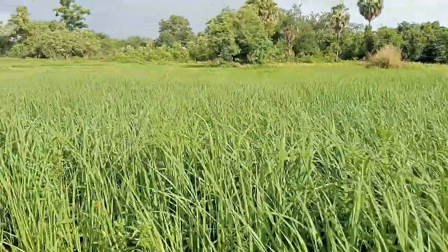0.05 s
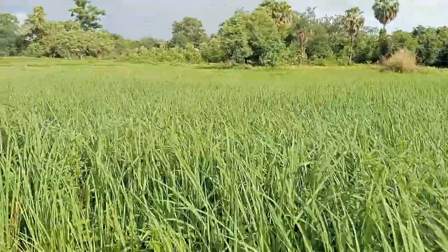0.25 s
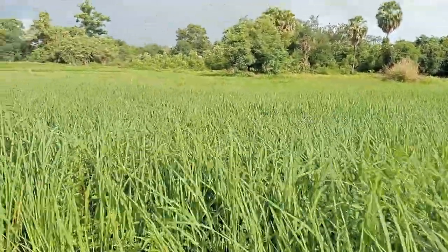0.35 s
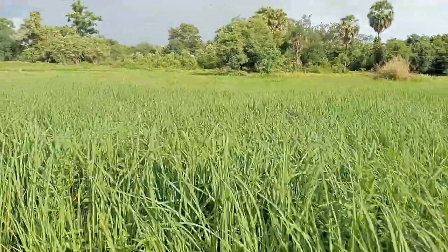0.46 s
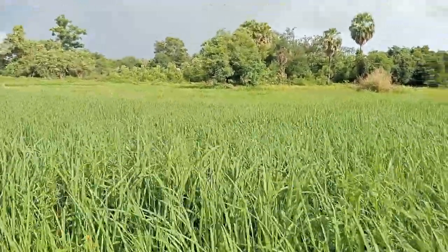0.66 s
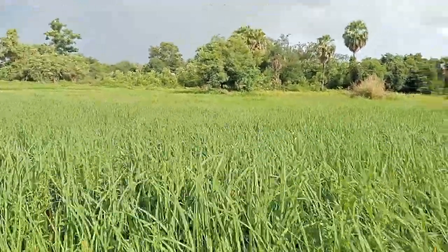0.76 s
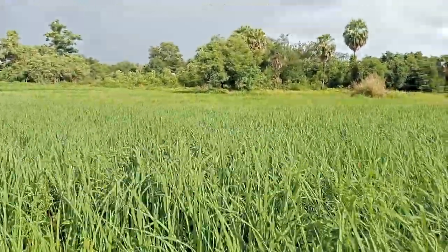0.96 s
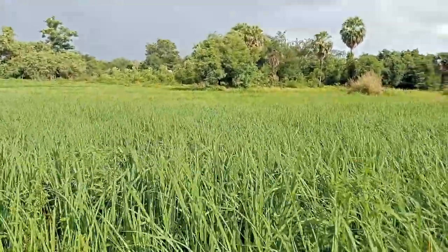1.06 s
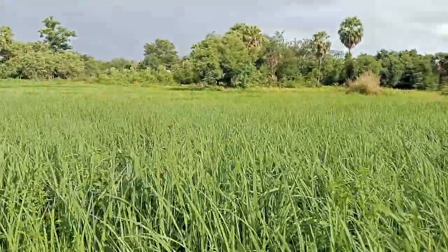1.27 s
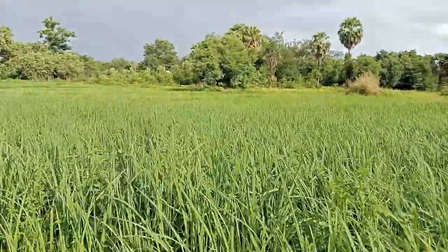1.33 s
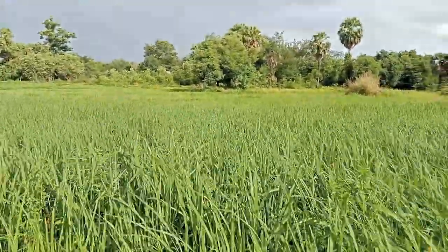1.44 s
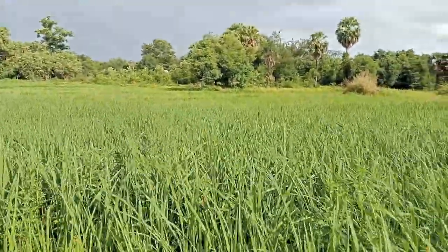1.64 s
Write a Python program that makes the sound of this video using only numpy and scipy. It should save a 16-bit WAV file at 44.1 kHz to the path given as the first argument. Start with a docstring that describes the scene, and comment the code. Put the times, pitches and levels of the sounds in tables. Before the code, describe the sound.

A wind gust rumbles and thumps on the microphone, strongest from about 0.3 to 0.6 seconds, when tiny dry ticks sound very close. It dies away by 0.9 seconds, leaving a few soft low puffs until about 1.6. Tall grass rustles quietly throughout, with a faint high hiss of insects. Thin, distant bird whistles sound briefly near 0.1, 0.9 and 1.6 seconds.

```python
"""A gust in tall grass

Tall grass rustles in an open field, with a faint high band of insects and a few far, thin whistles.
One gust rumbles and thumps on the microphone and dies away into a few soft puffs.
At its height, tiny dry ticks sound right at the microphone. The sound is mono."""
import sys
import numpy as np
from scipy import signal
from scipy.fft import rfft, irfft, next_fast_len
from scipy.io import wavfile
from scipy.ndimage import uniform_filter1d, map_coordinates

SR = 44100
rng = np.random.default_rng(int(sys.argv[2]) if len(sys.argv) > 2 else 0)


def waveform_to_disk(signal):
    """Save audio, clipped to [-1, 1], as 16-bit WAV at the path in sys.argv[1]."""
    frames = np.transpose(np.atleast_2d(signal))
    scaled = np.clip(frames, -1, 1) * 32767
    samples = np.round(scaled).astype(np.int16)
    wavfile.write(sys.argv[1], SR, samples)


N = 74970  # 1.7 seconds


def amp(db):
    """Turn decibels into a number to multiply a sound by."""
    return 10 ** (np.asarray(db) / 20)


def unit(x):
    """Scale a signal so that its average strength (rms) is 1."""
    return x / np.sqrt(np.mean(x ** 2) + 1e-20)


def clock():
    """The time of every sample, in seconds."""
    return np.arange(N) / SR


def curve(rows):
    """Join (time [s], value) points with straight lines."""
    return np.interp(clock(), *np.transpose(rows))


def wobble(rate):
    """A smooth curve through `rate` random values a second."""
    return map_coordinates(rng.standard_normal(1024), [clock() * rate], mode="wrap")


def filtered(x, response):
    """Turn each frequency of x up or down by the gain that `response` gives it."""
    size = next_fast_len(N + SR // 2)
    hz = np.fft.rfftfreq(size, 1 / SR)
    return irfft(rfft(x, size) * response(hz), size)[..., :N]


def coloured(x, tone):
    """Shape x with a table of (frequency [Hz], level [dB]), then set its strength to 1."""
    points_hz, db = np.transpose(tone)
    return unit(filtered(x, lambda hz: amp(np.interp(np.log(hz + 1), np.log(points_hz), db))))


def rush(tone, patchy_db):
    """A hiss with louder and softer patches scattered over pitch and time."""
    grid = signal.stft(rng.standard_normal(N), nperseg=512)[2]
    patches = uniform_filter1d(rng.standard_normal(grid.shape), size=5, axis=0)  # blur over pitch
    patches = uniform_filter1d(patches, size=12, axis=1)  # blur over time
    hiss = signal.istft(grid * amp(patchy_db * unit(patches)), nperseg=512)[1][:N]
    return coloured(hiss, tone)


def eddies(tone):
    """Small swirls of air: random swings of pressure, kept at an even strength."""
    swings = coloured(rng.standard_normal(N), tone)
    power = np.abs(signal.fftconvolve(swings ** 2, np.hanning(SR // 25), "same"))
    return unit(swings / np.sqrt(power + 1e-9))


# how hard the gust blows (time [s], level [dB])
GUST_LEVEL = [(0, -32.5), (.135, -44), (.2, -37), (.26, -30.5), (.288, -15.5), (.315, -24.5), (.345, -23.5),
              (.37, -30.5), (.405, -27.5), (.445, -26.5), (.468, -29), (.518, -16), (.54, -15),
              (.56, -27.5), (.65, -30), (.69, -25.5), (.715, -35), (.77, -30), (.82, -31), (.86, -61)]
# the tone of its low rumble and its higher flutter (frequency [Hz], level [dB])
RUMBLE_TONE = [(20, -26), (38, -31.5), (68, 0.5), (140, -3.5), (250, -12), (400, -24.5), (700, -46.5),
               (1500, -88)]
FLUTTER_TONE = [(120, -50), (260, 2.5), (600, -9), (850, -30), (1500, -30), (4000, -68)]

def gust():
    """Swirling air rumbles on the microphone, and flutters where it blows hard."""
    strong_wind_db, strong_flutter_db = -22.5, -46  # a strong wind and the flutter it brings
    fade_out = np.clip((GUST_LEVEL[-1][0] - clock()) / .01, 0, 1)
    force = amp(curve(GUST_LEVEL)) * fade_out
    flutter = amp(strong_flutter_db + 3.4 * wobble(60.3)) * (force / amp(strong_wind_db)) ** 0.95
    return force * eddies(RUMBLE_TONE) + flutter * eddies(FLUTTER_TONE)


# the deep tone of gently moving air (frequency [Hz], level [dB])
DRAUGHT_TONE = [(20, -30), (40, -19), (75, 1), (130, -5), (250, -12.5), (500, -28.5), (1500, -67)]

def draught(level_db=-54.5, sway_db=2.5):
    """A little air always stirs at the microphone and makes a faint rumble."""
    return amp(level_db + sway_db * wobble(12.3)) * eddies(DRAUGHT_TONE)


# how loud the far and the near grass are (time [s], level [dB])
FAR_GRASS_LEVEL = [(0, -45), (.1, -47.5), (.25, -47.5), (.43, -48), (.55, -49), (.78, -49.5), (1.1, -48.5),
                   (1.7, -49)]
NEAR_GRASS_LEVEL = [(0, -59), (.08, -48), (.14, -59), (.37, -51), (.44, -49.5), (.53, -53.5), (1.4, -55.5),
                    (1.48, -50), (1.57, -54.5), (1.7, -52)]
# the tone of each (frequency [Hz], level [dB])
FAR_GRASS_TONE = [(100, -20), (400, -0.5), (900, 0), (1550, -0.5), (1950, -1.5), (2300, 0.5), (2900, -1.5),
                  (4800, 1), (5800, -4), (7500, -2.5), (11000, -2.5), (13000, -4.5), (15500, -10)]
NEAR_GRASS_TONE = [(2000, -16.5), (3000, -10), (3500, -4.5), (4200, -0.5), (4700, -13), (5600, -17),
                   (8000, -10)]

def grass(brushes_per_s=2900, brush_db=-6):
    """Far blades brush together in a hiss full of tiny clicks, while nearer blades swish."""
    brushes = (rng.random(N) < brushes_per_s / SR) * rng.standard_normal(N)
    field = rush(FAR_GRASS_TONE, patchy_db=2.42) + amp(brush_db) * coloured(brushes, FAR_GRASS_TONE)
    far = amp(curve(FAR_GRASS_LEVEL) + 0.35 * wobble(16.9)) * field
    near = amp(curve(NEAR_GRASS_LEVEL) + wobble(23.6)) * rush(NEAR_GRASS_TONE, patchy_db=0.5)
    return far + near


# how loud the insects are (time [s], level [dB])
INSECT_LEVEL = [(0, -45.5), (.15, -46), (.33, -45.5), (.52, -48.5), (.8, -49), (1.03, -48), (1.25, -49),
                (1.45, -48), (1.7, -49)]
# their high, thin tone (frequency [Hz], level [dB])
INSECT_TONE = [(6000, -32), (7800, -15), (8600, -3), (9200, 1.5), (10000, -2), (10800, -5.5), (12500, -13),
               (15000, -32)]

def insects():
    """Many far insects blend into one shimmering hiss."""
    level_db = curve(INSECT_LEVEL) + 0.31 * wobble(20.1) + 0.48 * wobble(130)
    return amp(level_db) * rush(INSECT_TONE, patchy_db=0.4)


# one row per whistle (start [s], length [s], pitch [Hz], pitch rise [Hz], level [dB])
WHISTLE_NOTES = [(.065, .035, 2800, 1500, -53), (.885, .055, 3230, 0, -56.5), (1.605, .09, 3470, -30, -59)]

def whistles():
    """Far whistles, probably birds: short, wavering notes that hold their pitch or slide."""
    out = np.zeros(N)
    for start, length, hz, rise, db in WHISTLE_NOTES:
        progress = np.clip((clock() - start) / length, 0, 1)
        pitch = (hz + rise * progress) * (1 + .012 * wobble(150))
        phase = 2 * np.pi * np.cumsum(pitch) / SR
        swell = np.sqrt(2 * np.abs(np.sin(np.pi * progress)))
        out += amp(db + 2.2 * wobble(70.1)) * swell * np.sin(phase)
    return out


# one row per thump (time [s], peak level [dB], pitch [Hz])
AIR_THUMPS = [(0.159, -25, 133), (.181, -23, 142), (0.219, -21.5, 176), (.245, -18, 131), (.281, -12, 241),
              (.441, -11.5, 146.5), (0.499, -13, 102), (0.569, -15, 130), (.613, -19, 108),
              (.928, -33.5, 98), (1.051, -29, 111), (1.192, -29, 132), (1.365, -36, 113)]

def thumps(width_cycles=0.7):
    """A single swirl of air hits the microphone and swings the pressure once or twice."""
    out = np.zeros(N)
    for time, db, hz in AIR_THUMPS:
        cycles = (clock() - time) * hz
        swell = np.exp(-(cycles / width_cycles) ** 2)
        out += amp(db) * swell * np.cos(2 * np.pi * (cycles + rng.random()))
    return out


# one row per slap (time [s], level [dB])
AIR_SLAPS = [(0.285, -44), (0.442, -34), (.489, -42), (0.528, -39), (0.584, -34.5), (0.604, -31.5),
             (0.682, -42)]
# the tone of a slap (frequency [Hz], level [dB])
SLAP_TONE = [(150, -31), (350, 1.5), (650, 1), (900, -13), (1400, -14.5), (1800, -23), (5000, -63)]

def slaps(width_s=0.0024):
    """Sharp bursts of air in the gust slap the microphone."""
    force = sum(amp(db) * np.exp(-((clock() - time) / width_s) ** 2) for time, db in AIR_SLAPS)
    return force * eddies(SLAP_TONE)


# one row per tick (time [s], peak level [dB])
DRY_TICKS = [(.3015, -22), (.3063, -21.5), (.3257, -22.5), (.3318, -21.5), (.3456, -15.5), (.361, -22.5),
             (.3735, -26.5), (.3949, -27), (.4428, -22), (.4838, -29), (.5935, -28.5)]
# the pitches that ring in a tick (pitch [Hz], level [dB], time to fade by 60 dB [s])
TICK_RING = [(1900, -19, .0015), (8500, -5, .0008), (11800, 0, .0007)]

def ticks():
    """Each tick is one tiny hit at the microphone that rings for about a millisecond."""
    out, t = np.zeros(N + SR), np.arange(256) / SR
    ring = np.zeros(len(t))
    for k, (hz, db, fade_s) in enumerate(TICK_RING):
        ring += (-1) ** k * amp(db - 60 * t / fade_s) * np.sin(2 * np.pi * hz * t)
    for time, db in DRY_TICKS:
        out[round(time * SR):][:len(t)] += amp(db) * ring / np.abs(ring).max()
    return out[:N]


# one row per puff (time [s], level [dB], length [s])
AIR_PUFFS = [(0.899, -49, 0.059), (1.023, -43.5, .02), (1.065, -39.5, 0.042), (1.152, -43.5, 0.11),
             (1.203, -32, 0.061), (1.378, -44.5, 0.044), (1.585, -42.5, 0.051)]
# the dull tone of a puff (frequency [Hz], level [dB])
PUFF_TONE = [(20, -38), (40, -15), (72, 1.5), (120, -2.5), (200, -12.5), (320, -21.5), (550, -33.5),
             (1500, -75)]

def puffs(rise_share=.4):
    """After the gust, soft puffs of air rise quickly and fall more slowly."""
    t, force = clock(), np.zeros(N)
    for time, db, length in AIR_PUFFS:
        width = length * np.where(t < time, rise_share, 1 - rise_share)
        force += amp(db) * np.exp(-((t - time) / width) ** 2)
    return force * eddies(PUFF_TONE)


def scene():
    """Add up all the sounds; left and right get the same mix."""
    mix = gust() + draught() + grass() + insects() + whistles() + thumps() + slaps() + ticks() + puffs()
    return np.array([mix, mix])


def record(dry):
    """Cut away the very highest treble."""
    top_hz = 15550
    return filtered(dry, lambda hz: hz < top_hz)


dry = scene()
out = record(dry)
waveform_to_disk(out)
```